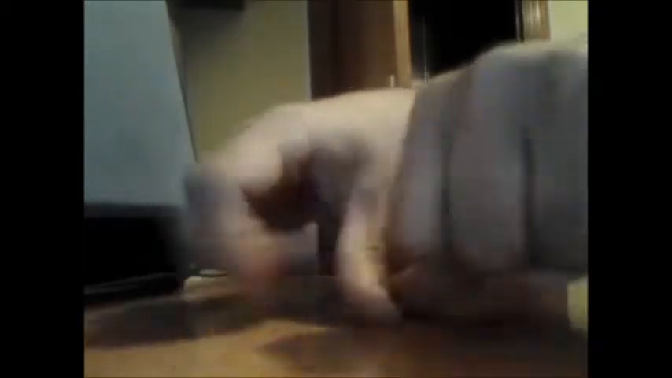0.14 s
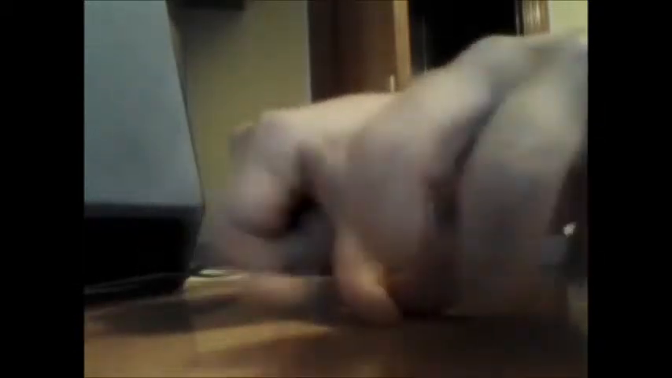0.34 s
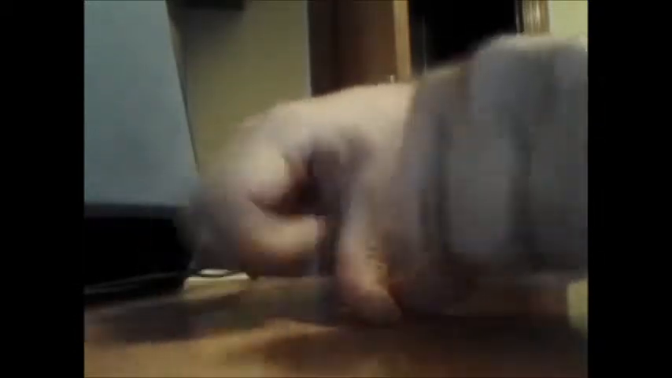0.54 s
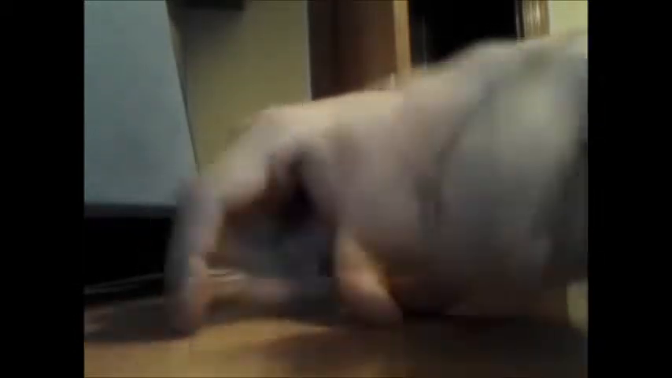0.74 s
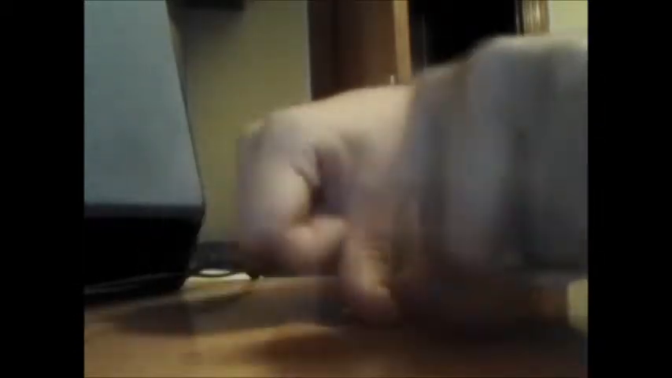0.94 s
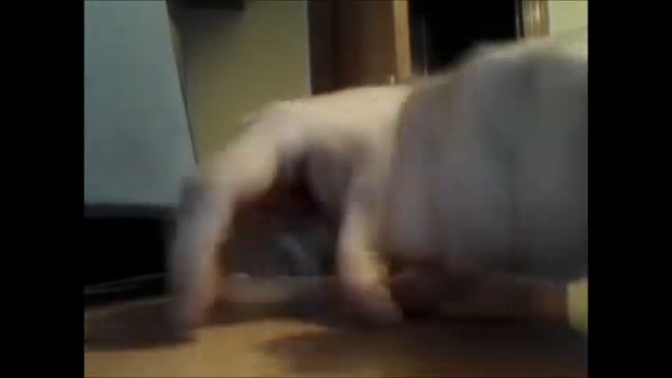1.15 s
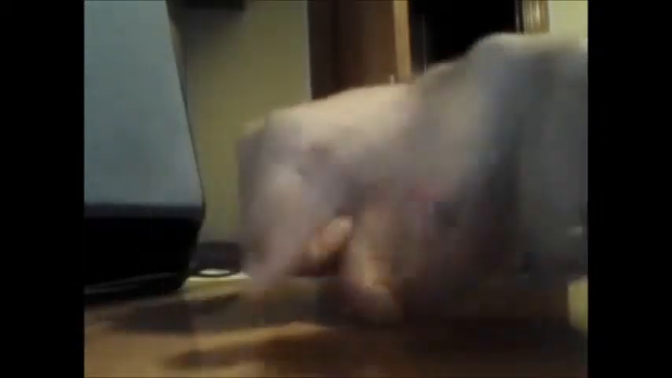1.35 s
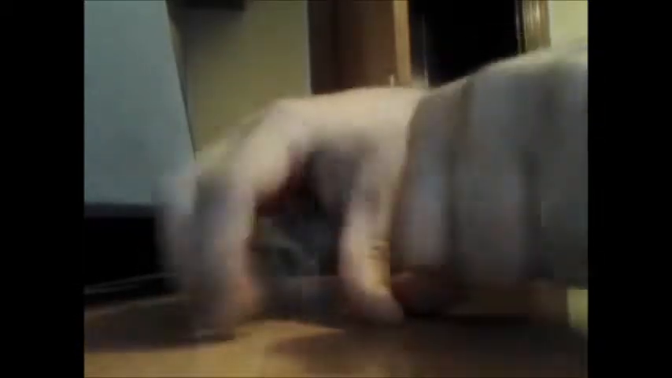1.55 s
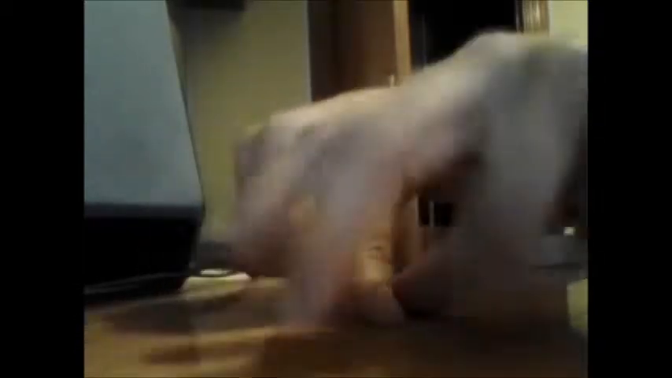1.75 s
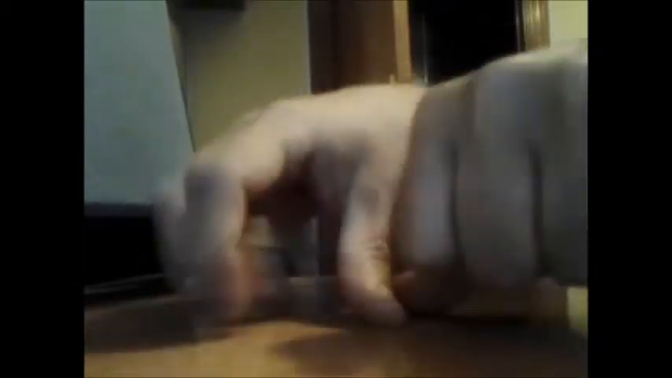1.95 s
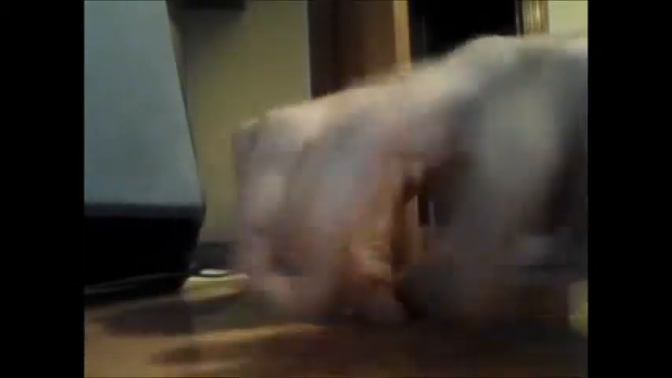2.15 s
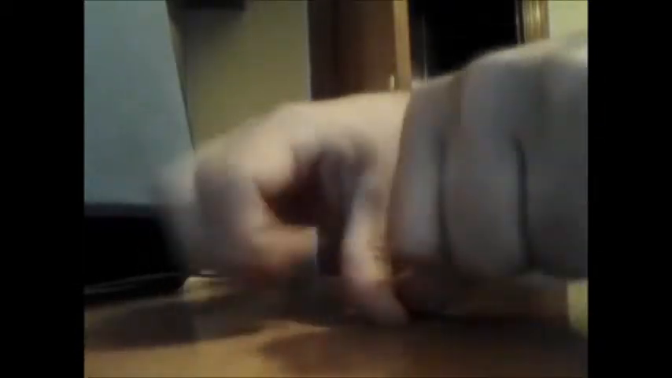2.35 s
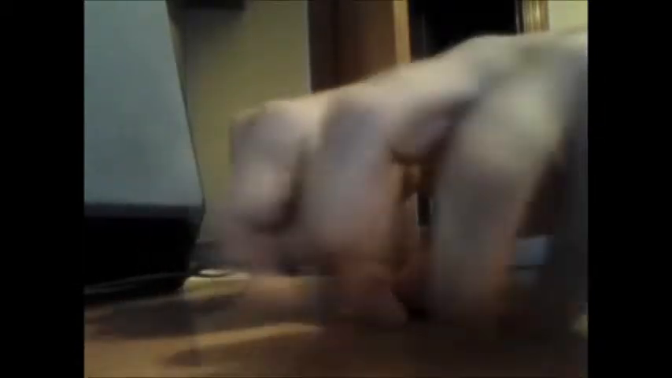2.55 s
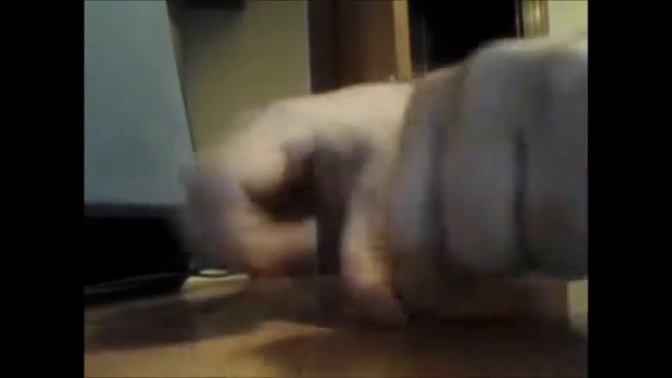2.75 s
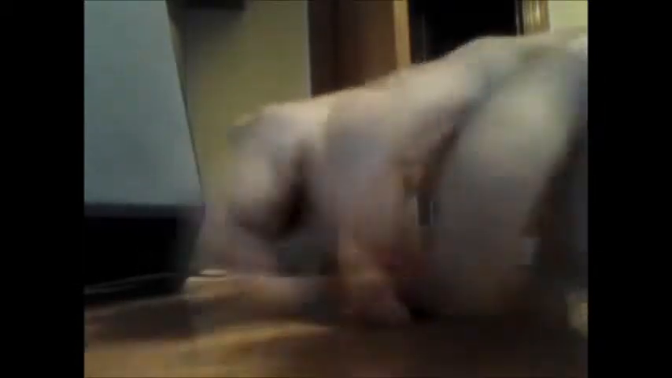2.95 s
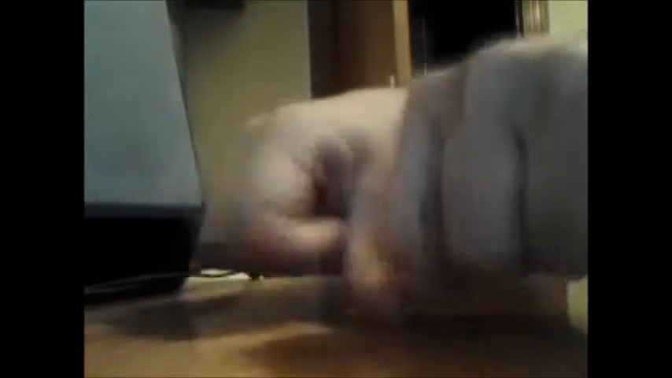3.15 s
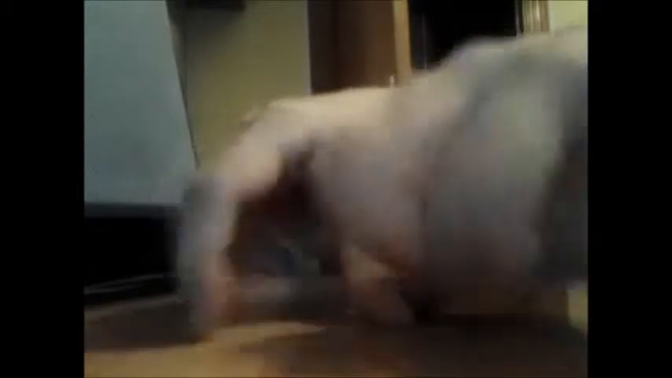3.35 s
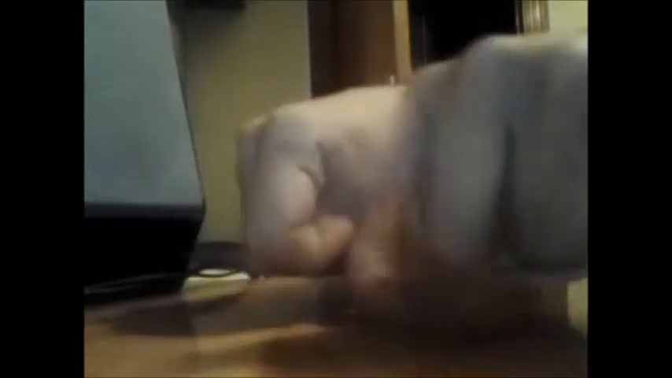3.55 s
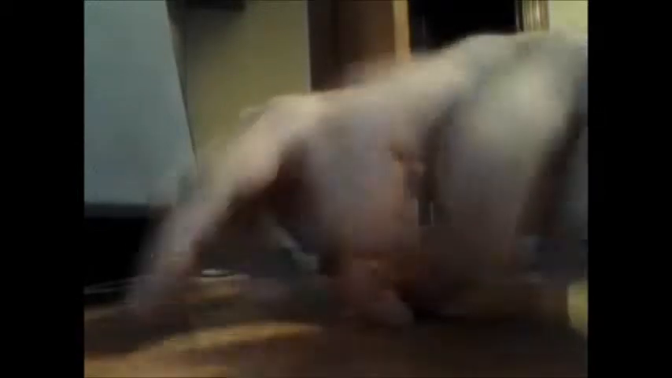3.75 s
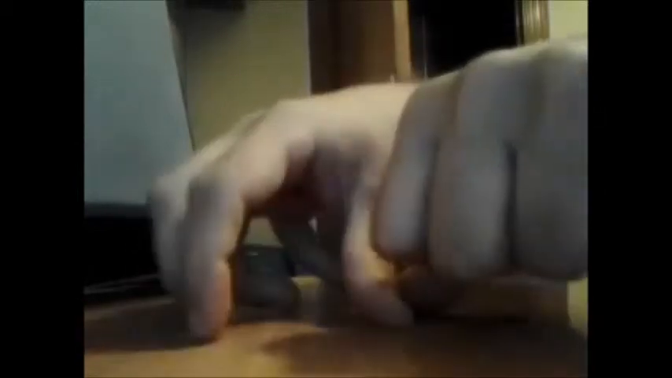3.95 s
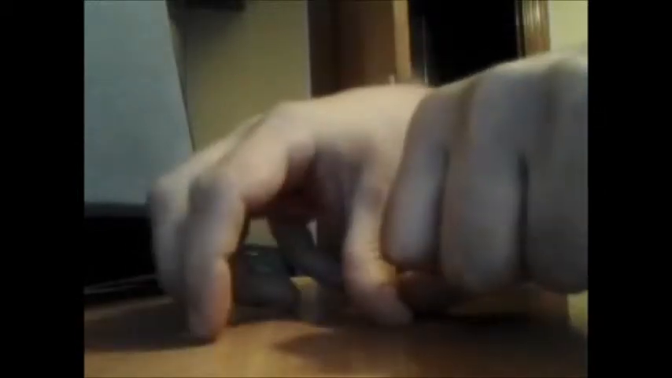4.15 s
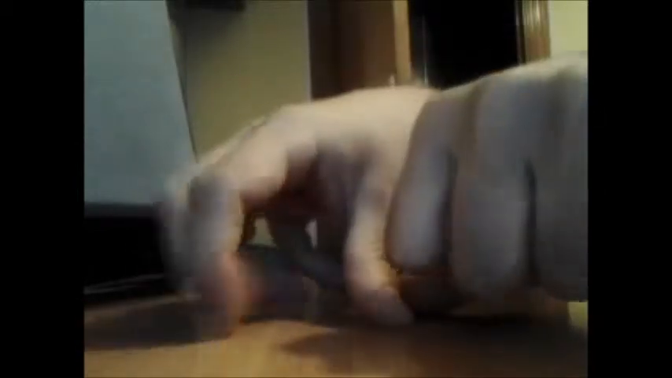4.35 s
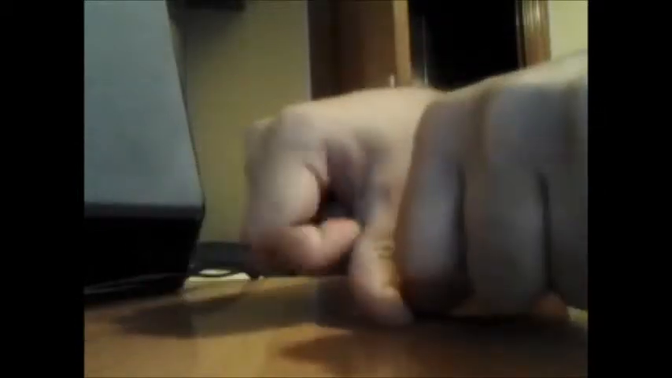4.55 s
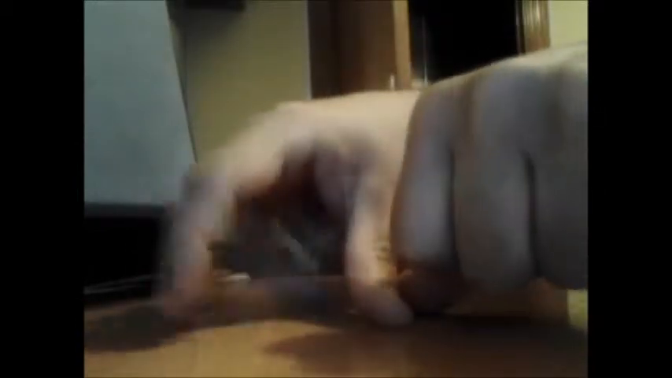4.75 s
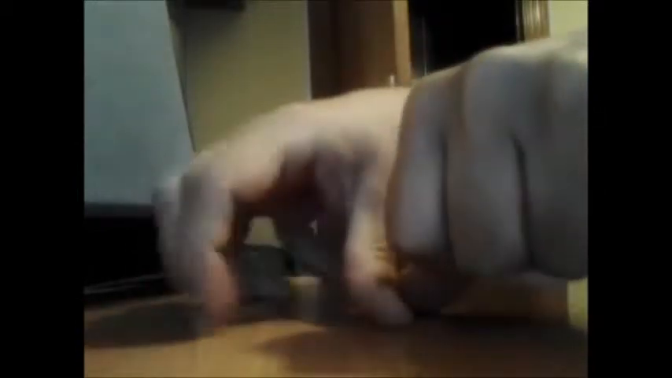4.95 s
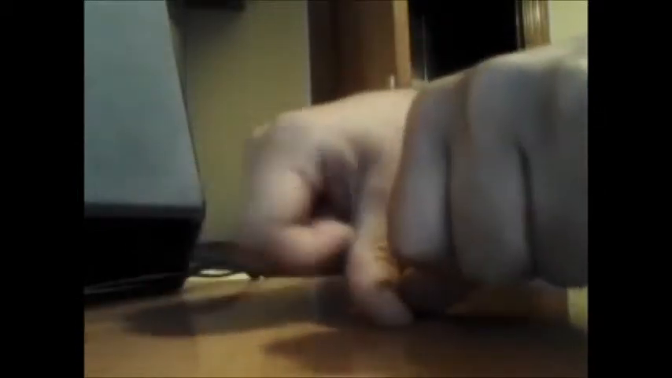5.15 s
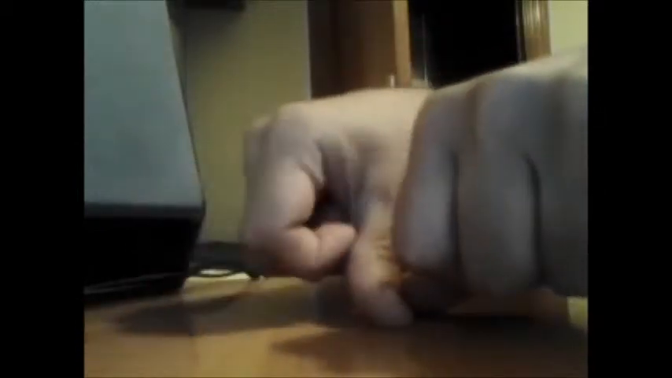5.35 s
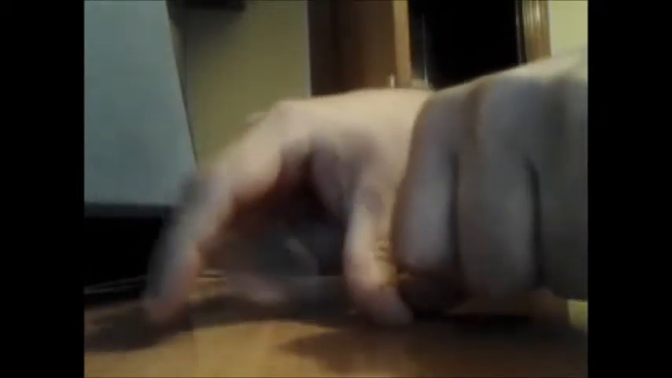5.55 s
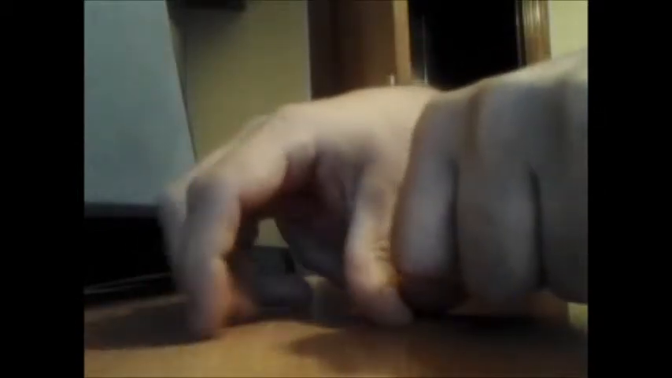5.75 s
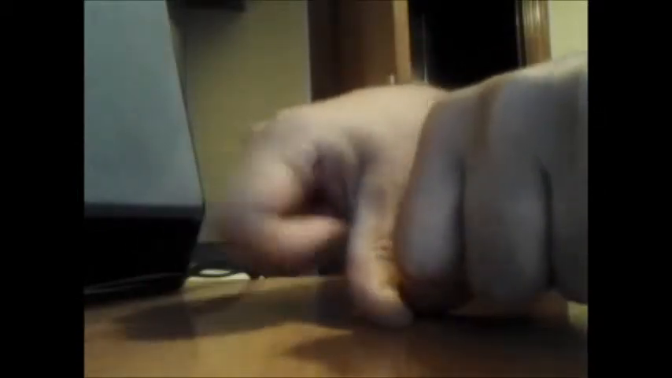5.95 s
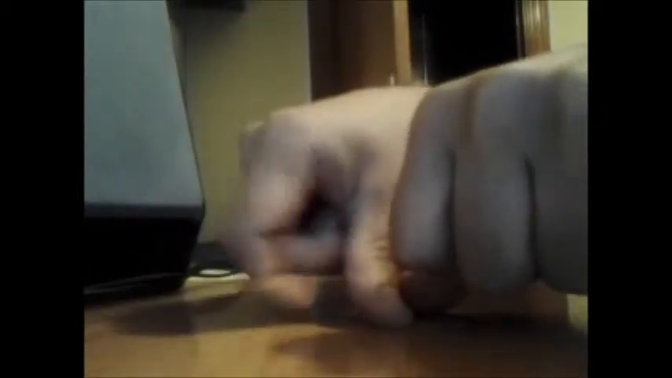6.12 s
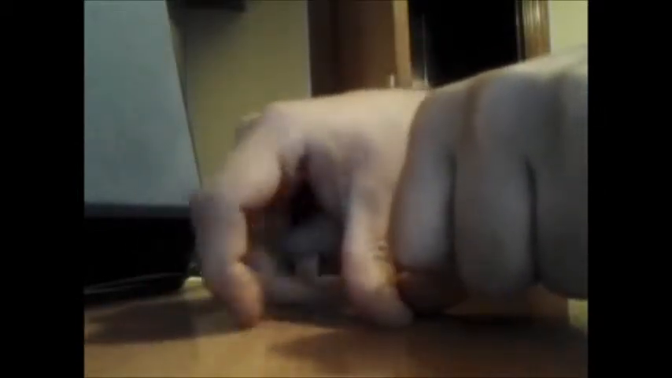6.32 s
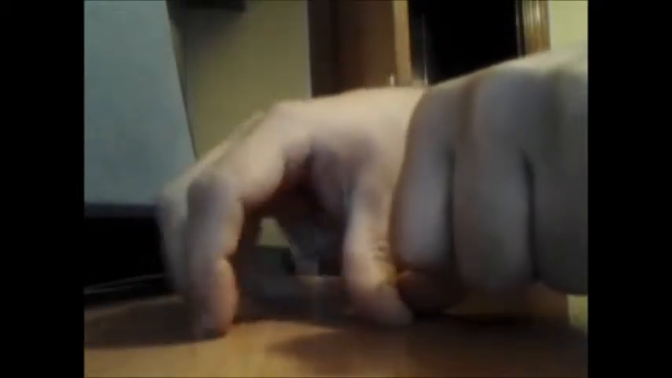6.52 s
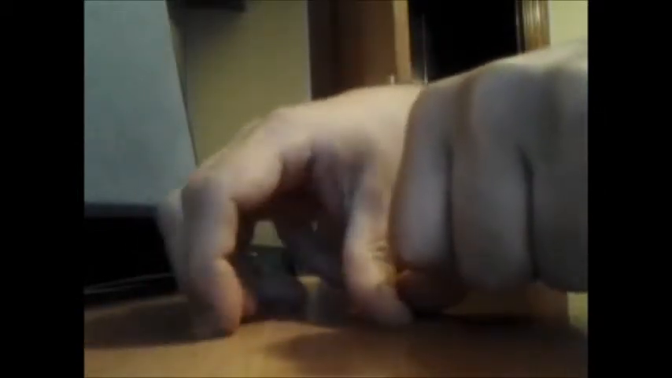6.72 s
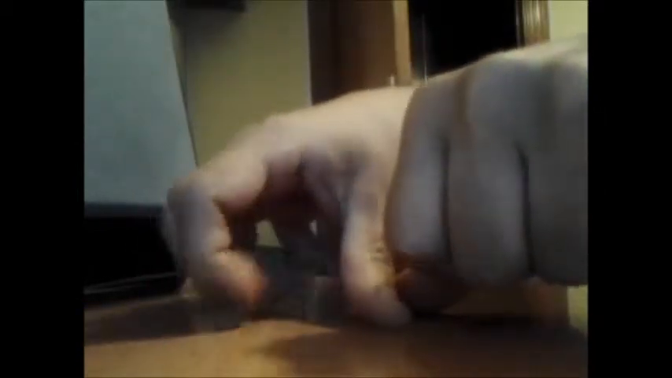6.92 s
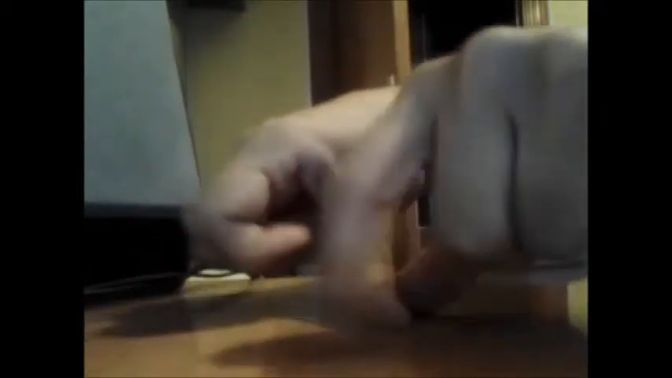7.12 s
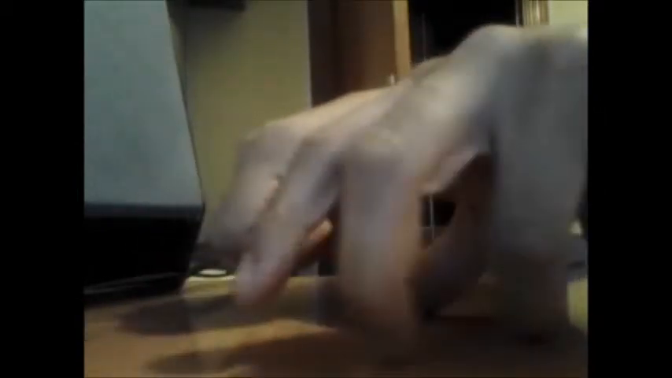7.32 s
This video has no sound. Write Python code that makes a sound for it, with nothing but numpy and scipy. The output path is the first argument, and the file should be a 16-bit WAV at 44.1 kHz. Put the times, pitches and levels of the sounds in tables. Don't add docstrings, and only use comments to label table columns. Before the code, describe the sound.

Rapid galloping finger drumming on a wooden tabletop, close and boxy with small nail clicks, then slower separate taps over faint fan hiss.

```python
import sys
import numpy as np
from scipy import signal
from scipy.fft import rfft, irfft
from scipy.io import wavfile

SR = 44100
rng = np.random.default_rng(int(sys.argv[2]) if len(sys.argv) > 2 else 0)


def how_loud(loudness_db):
    steps = np.asarray(loudness_db, float) / 20
    return 10 ** steps


def store_wav(level_fs):
    pcm = np.round(np.clip(np.atleast_2d(level_fs), -1, 1) * 32767)
    wavfile.write(sys.argv[1], SR, pcm.T.astype(np.int16))


N = 325458

# (frequency [Hz], density [dB per Hz])
FAN_HISS = [(100, -53), (170, -17.5), (444, -7), (1060, -8.5), (1200, -11), (6900, -22), (8970, -53),
            (15200, -120)]
# (frequency [Hz], level [dB])
FAN_LINES = [(452.2, -83), (656.8, -63.5), (1093, -66), (2471, -94), (3278, -70)]

# (frequency [Hz], decay t60 [s], mode shape at spots 0, 1, 2 [ratio])
FAR_MODES = [(324, 0.038, 0.01, 0.033, 0.043), (422, 0.083, 0.028, 0.067, 0.059),
             (502, 0.1, 0.014, 0.041, 0.045), (671, 0.038, 0.141, 0.367, 0.286),
             (737, 0.068, 0.09, 0.245, 0.185), (762, 0.111, 0.07, 0.215, 0.159),
             (827, 0.006, -0.359, -1.0, -1.0), (959, 0.038, 0.074, 0.132, 0.144),
             (1118, 0.11, -0.017, -0.047, -0.006), (1229, 0.068, -0.077, -0.121, -0.104),
             (1280, 0.111, -0.086, -0.142, -0.079), (1370, 0.032, 0.153, 0.259, 0.132),
             (1496, 0.012, -0.454, -0.766, -0.211), (1619, 0.011, 0.002, -0.242, 0.356),
             (1738, 0.014, 0.315, 0.463, 0.032), (2078, 0.011, -0.725, -0.284, -0.658),
             (2208, 0.026, -0.3, -0.08, -0.186), (2674, 0.011, 1.0, 0.03, 0.851),
             (3188, 0.031, -0.07, -0.008, -0.122), (3671, 0.006, -0.825, -0.627, -0.685),
             (4025, 0.006, 0.317, -0.097, -0.258), (4645, 0.006, 0.283, -0.075, -0.005),
             (5404, 0.007, -0.023, 0.182, -0.295), (5944, 0.006, -0.157, -0.21, -0.155),
             (6638, 0.006, -0.066, 0.31, -0.189)]
NEAR_MODES = [(357, 0.07, -0.026, -0.035, -0.056), (461, 0.006, 0.294, 0.288, 0.46),
              (537, 0.082, -0.079, -0.09, -0.144), (647, 0.102, 0.06, 0.081, 0.101),
              (734, 0.111, 0.013, 0.046, 0.073), (780, 0.064, -0.218, -0.302, -0.468),
              (877, 0.038, -0.197, -0.229, -0.297), (976, 0.024, -0.14, -0.176, -0.211),
              (1095, 0.111, -0.015, -0.005, -0.004), (1180, 0.111, -0.026, -0.021, -0.031),
              (1286, 0.111, 0.069, 0.091, 0.089), (1402, 0.024, -0.204, -0.208, -0.177),
              (1537, 0.085, -0.055, -0.056, -0.036), (1628, 0.022, -0.411, -0.375, -0.273),
              (1868, 0.015, -0.192, -0.164, -0.074), (2010, 0.017, 1.0, 1.0, 0.251),
              (2266, 0.03, -0.222, -0.326, -0.259), (2567, 0.026, -0.15, -0.378, -0.485),
              (3277, 0.01, 0.031, 0.731, 1.0), (3585, 0.016, 0.108, 0.206, 0.245),
              (4042, 0.006, -0.328, -0.866, -0.579), (4991, 0.006, 0.268, 0.199, -0.708),
              (5752, 0.006, -0.138, 0.035, -0.062), (6251, 0.006, -0.097, 0.234, 0.742),
              (6827, 0.006, 0.014, -0.31, -0.151)]

# (time [s], blow [dB], nail beyond the finger's usual [dB])
FAR_FIRST = [(.1818, -1.4, 1.5), (.5313, 1.2, -7), (1.6376, -4.5, 9.5), (2.0022, -3.5, 5.5),
             (2.7385, -1.5, -1.5), (3.1232, 0.2, -3.5), (3.4625, 0, -13), (3.8742, -1, -2.5),
             (4.8383, -5.5, -9.5), (5.6490, -3, -9.5), (6.3456, -4.5, -4)]
FAR_SECOND = [(.2289, 5, -3), (0.5845, 4.5, -1.1), (0.9416, 2.5, 1.5), (1.3108, 2, 1.8), (1.6844, 2.5, 1.4),
              (2.0586, 2, 4), (2.4154, 1, 3.5), (2.7988, 2.5, 0.5), (3.1658, 2, 2), (3.5159, 3, 0),
              (3.9067, 1.5, 2.8), (4.8842, -1.5, -1.5), (5.6980, .2, 0.5), (6.4895, -3, 2)]
FAR_THIRD = [(0.2713, 3.5, 0.5), (.6310, 4, 2.3), (0.9815, 4, 0.2), (1.3599, 5, 0.6), (1.7265, 3.5, 3.3),
             (2.0972, 4, -1.2), (2.4616, 4.5, 0.3), (2.8377, 4, 0.9), (3.207, 5.5, 1.5), (3.5523, 4.5, -1),
             (3.9346, 3, 1), (4.9402, 0.3, 1), (5.7588, 0, .6), (6.6468, 1.6, -2.5)]
FAR_FOURTH = [(.0004, -23.5, 12.5), (.3192, -5, 1.5), (0.6822, -6, 2.5), (1.0331, -5, 0.6),
              (1.4142, -7.5, 2.5), (1.7849, -6.5, 0), (2.1577, -4.5, 0), (2.5107, -5, -0.5),
              (2.9029, -6, 1), (3.258, -4, 0.6), (3.6058, -7.5, 4.5), (4.0166, -6.5, -1.2),
              (5.0246, -9.5, -.8), (5.8328, -7, -2.5), (6.7798, -6.5, -0.1)]
NEAR_FIRST = [
    (.0201, -9, 3),
    (1.1159, -8.5, 1.5),
    (1.4581, -2.5, -7.5),
    (1.8241, -3, -1),
    (2.2000, -9, 1.5),
    (2.5793, -3.5, -4),
    (3.3303, -5, -1.5),
    (3.7072, -3, -5),
]
NEAR_FIRST_SHORT = [
    (0.3638, -10.5, 2.7),
    (0.728, -8, -0.5),
    (2.9475, -13, 3.5),
    (7.2341, -15.5, 1.5),
]
NEAR_SECOND = [(0.0754, 4.2, 0.3), (.4149, 4.4, -0.7), (0.7783, 4.1, 0.3), (1.1576, 4, -.2),
               (1.5118, 4.6, 1.6), (1.8734, 4, 1.3), (2.2456, 4.1, .4), (2.6208, 5, 1), (2.9889, 0.25, 1.3),
               (3.3839, 5.9, 1), (3.7448, 1.25, 0.6)]
NEAR_THIRD = [(0.1098, .1, 1.1), (.4550, 1.5, 1.8), (0.8256, 1.6, 1.2), (1.2018, 2.6, -1.1),
              (1.5541, .8, 1.2), (1.9244, 1, -1.8), (2.3027, 0.85, -0.078), (2.6660, 1.6, 1.4),
              (3.0342, 1.1, 0.91), (3.4311, 1.2, -0.61), (3.7919, 2, -1.3)]
NEAR_FOURTH = [(.1618, 0.7, 0.5), (.5045, 1.5, -0.2), (0.8907, 5.5, -2.1), (.8944, -7.5, 7),
               (1.2504, 3, -2.6), (1.2575, 8, -18), (1.6034, 4, -2), (1.9825, 2.1, 0.2), (2.3622, 6, -4),
               (2.7184, 3, -0.3), (3.0900, 1.7, -0.5), (3.4773, 3.5, -0.8), (3.8350, 2, 1.5)]

# (pad contact [ms], nail share [dB], nail tick [dB])
FAR_TOUCH = [(0.44, -8, -11), (0.48, -7, -7), (0.4985, -6.5, 1), (0.56, -2, -17.5)]
NEAR_TOUCH = [(0.57, 0.97, -6), (0.46, -5, -23), (0.82, -5, -9), (0.596, -6, -7), (0.6, -4, -11.5)]
FAR_SPOTS = [2, 0, 0, 1]
NEAR_SPOTS = [1, 2, 0, 0, 0]
# (pad contact [ms], nail share [dB], nail tick [dB])
FAR_EFFORT = (-0.0016, 0.29, 1.7)
NEAR_EFFORT = (-0.001, 0.085, 0.33)

# (centre [Hz], level [dB], decay t60 [s])
ROOM_BANDS = [(330.8, 6.5, 0.2), (561, -3, 0.26), (806, -4.5, 0.29), (1264, 0, 0.24), (1680, -5.5, 0.33),
              (2775, -3, 0.16), (3500, -13, 0.5), (4660, -7, 0.2), (6740, -7, 0.35)]

# (time [s], level [dB], centre [Hz])
BRUSHES = [
    (5.64, -53, 3950),
    (6.339, -49.5, 5400),
    (6.635, -51, 3850),
    (6.771, -52, 4500),
    (7.226, -47, 3500),
    (7.334, -42, 890),
    (7.337, -49, 2220),
    (7.376, -46, 3100),
]

# (far hand [dB], near hand [dB])
LEAK_DB = (-16.5, -30)
# (low edge [Hz], high edge [Hz])
LEAK_HZ = (70, 240)


def band(x, lo_hz, hi_hz, order=2):
    return signal.sosfilt(signal.butter(order, [lo_hz, min(hi_hz, .45 * SR)], "band", fs=SR, output="sos"), x)


def level(x, db):
    return x * how_loud(db) / np.sqrt(np.mean(x ** 2))


def fan():
    hz, db = np.transpose(FAN_HISS)
    f = np.maximum(np.arange(N // 2 + 1) * SR / N, 1)
    colour = how_loud(np.interp(np.log(f), np.log(hz), db))
    sound = level(irfft(rfft(rng.standard_normal(N)) * colour, N), -54)
    t = np.arange(N) / SR
    for line_hz, line_db in FAN_LINES:
        waver = np.cumsum(0.025 * rng.standard_normal(N))
        sound += how_loud(line_db) * np.sin(2 * np.pi * line_hz * t + waver)
    return sound


def rolls(fingers, touch, spots, effort):
    tick_per_nail = 1.12
    pad_ms_per_nail = -0.0072
    taps = []
    for landings, usual, spot in zip(fingers, touch, spots):
        s, blow_db, more_nail_db = np.transpose(landings)
        extra_blow_db = blow_db - np.median(blow_db)
        pad_ms, nail_db, tick_db = (np.array(usual) + np.outer(extra_blow_db, effort)).T
        pad_ms = np.clip(pad_ms + pad_ms_per_nail * more_nail_db, .2, 1)
        tick_db = np.minimum(tick_db + tick_per_nail * more_nail_db, 0)
        taps.append(np.transpose([s, blow_db, pad_ms, nail_db + more_nail_db, np.full_like(s, spot), tick_db]))
    return np.concatenate(taps)


def push(late, ms):
    phase = (np.arange(96)[None] - late[:, None]) / (ms[:, None] * SR / 1000)
    force = np.sin(np.pi * np.clip(phase, 0, 1))
    return force / force.sum(axis=1, keepdims=True)


def board_ring(force, spot, modes, t):
    hz, t60, *shapes = np.transpose(modes)
    rings = np.sin(2 * np.pi * np.outer(hz, t)) * how_loud(-60 * np.outer(1 / t60, t))
    scatter = how_loud(1.17 * rng.standard_normal((len(spot), len(hz))))
    strength = np.array(shapes)[spot.astype(int)] * scatter
    return signal.fftconvolve(strength @ rings, force, axes=1)[:, :len(t)]


def nail_tick(board, tick_db, t):
    tick_hz, t60_s = 2210, 0.012
    noise = band(rng.standard_normal(board.shape), tick_hz, 2.22 * tick_hz)
    peak = np.abs(board).max(axis=1, keepdims=True)
    return peak * noise * how_loud(-1 + tick_db[:, None] - 60 * t / t60_s)


def hand(taps, modes):
    nail_ms, board_db = .13, 1.02
    s, blow_db, pad_ms, nail_db, spot, tick_db = np.transpose(taps)
    start = (s * SR).astype(int)
    late = s * SR - start
    t = np.arange(SR // 5) / SR
    force = push(late, pad_ms) + how_loud(nail_db)[:, None] * push(late, np.full_like(s, nail_ms))
    board = board_ring(force, spot, modes, t)
    sound = how_loud(blow_db + board_db)[:, None] * (board + nail_tick(board, tick_db, t))
    direct = np.zeros(N + len(t))
    for i, tap in zip(start, sound):
        direct[i:i + len(t)] += tap
    return direct[:N] + room(start, sound)


def room(start, sound):
    room_db, rise_s, feed_width = -35.5, 0.0018, 1.346
    t = np.arange(SR // 2) / SR
    build_up = 1 - np.exp(-(t / rise_s) ** 2)
    tail = np.zeros(N)
    for hz, db, t60 in ROOM_BANDS:
        onset = band(sound[:, :SR // 40], hz / feed_width, hz * feed_width)
        feed = np.zeros(N)
        feed[start] = np.linalg.norm(onset, axis=1)
        noise = band(rng.standard_normal(len(t)), hz / 1.238, hz * 1.266, order=3)
        echo = level(noise, db + room_db) * how_loud(-60 * t / t60) * build_up
        tail += signal.fftconvolve(feed, echo)[:N]
    return tail


def brushes():
    puff_s = 0.0027
    t = np.arange(N) / SR
    sound = np.zeros(N)
    for s, db, hz in BRUSHES:
        hiss = level(band(rng.standard_normal(N), hz / 1.5, hz * 1.3), db)
        sound += hiss * np.exp(-((t - s) / puff_s) ** 2)
    return sound


def scene():
    far_fingers = [FAR_FIRST, FAR_SECOND, FAR_THIRD, FAR_FOURTH]
    near_fingers = [NEAR_FIRST, NEAR_FIRST_SHORT, NEAR_SECOND, NEAR_THIRD, NEAR_FOURTH]
    far = rolls(far_fingers, FAR_TOUCH, FAR_SPOTS, FAR_EFFORT)
    near = rolls(near_fingers, NEAR_TOUCH, NEAR_SPOTS, NEAR_EFFORT)
    hands = np.array([hand(far, FAR_MODES), hand(near, NEAR_MODES)])
    leak = band(how_loud(np.array(LEAK_DB)) @ hands, *LEAK_HZ, order=3)
    bass_cut = signal.butter(8, 312, "high", fs=SR, output="sos")
    taps = signal.sosfilt(bass_cut, hands.sum(axis=0))
    return (fan() + taps + leak + brushes())[None]


def band_limit(x):
    return signal.sosfilt(signal.butter(12, 16680, fs=SR, output="sos"), x)


def record(dry):
    treble_hz, top_hz = 7000, 16600
    rumble_hz, rumble_db, offset = 74.5, -72.5, .0024
    x = signal.sosfilt(signal.cheby1(10, .2, treble_hz, fs=SR, output="sos"), dry)
    rumble = level(band(rng.standard_normal(N), 12, rumble_hz, order=4), rumble_db)
    x = np.clip(x + rumble + offset, -1, 1)
    x = signal.sosfiltfilt(signal.ellip(6, .1, 35, top_hz, fs=SR, output="sos"), x)
    return band_limit(x)


dry = scene()
out = record(dry)
store_wav(out)
```